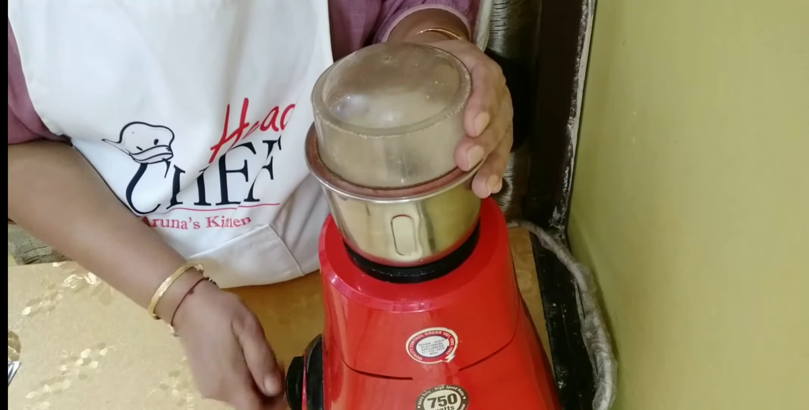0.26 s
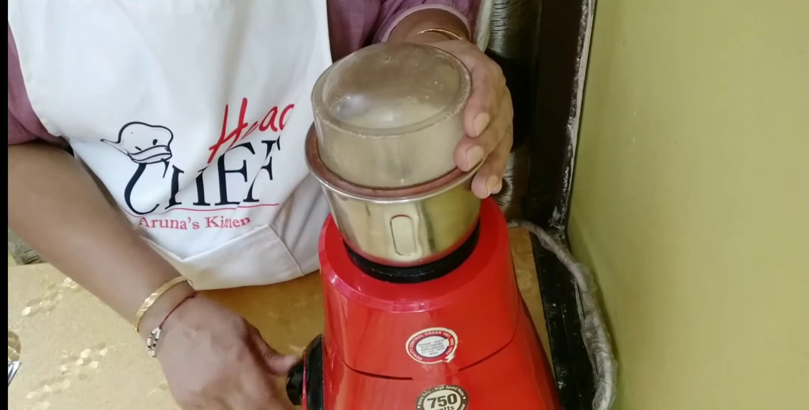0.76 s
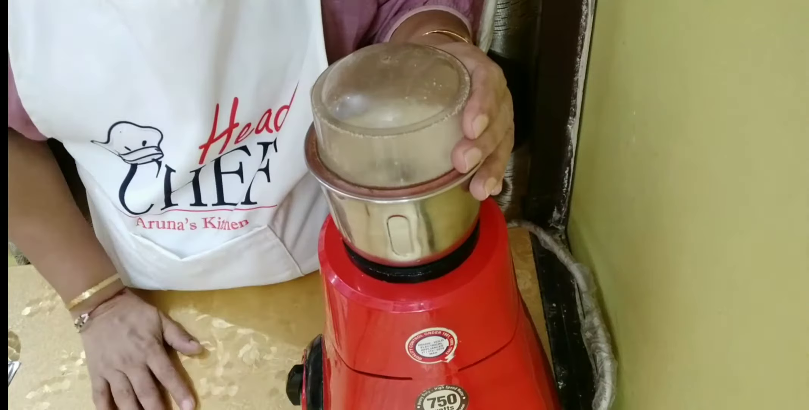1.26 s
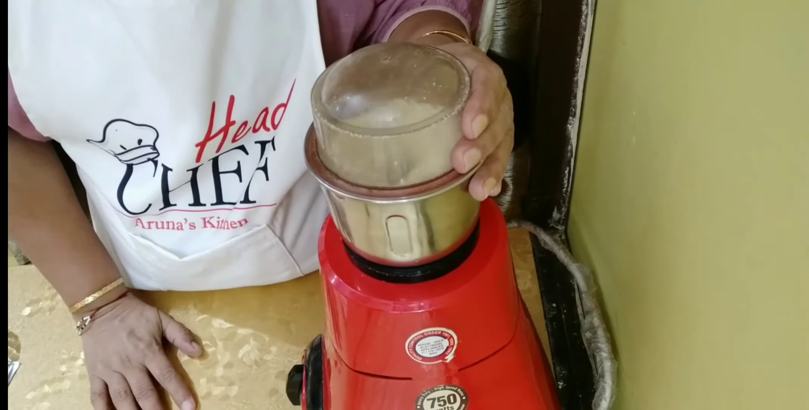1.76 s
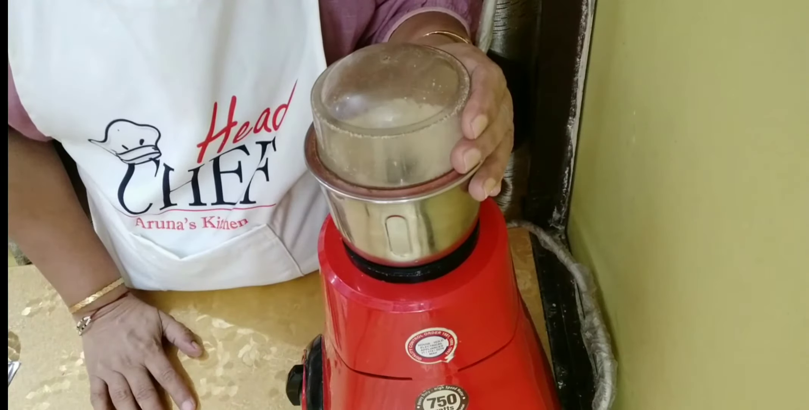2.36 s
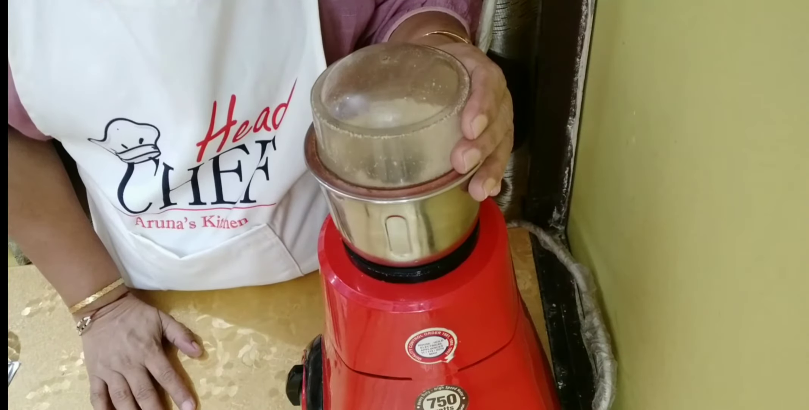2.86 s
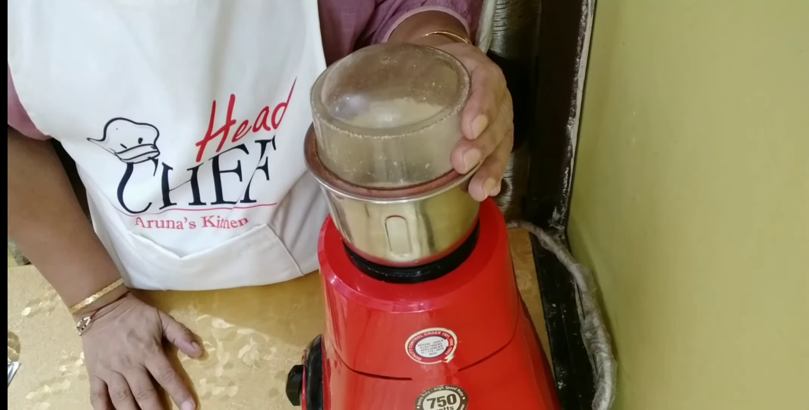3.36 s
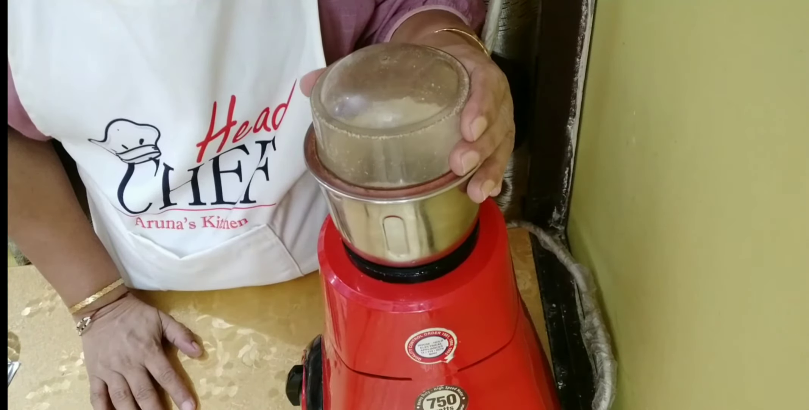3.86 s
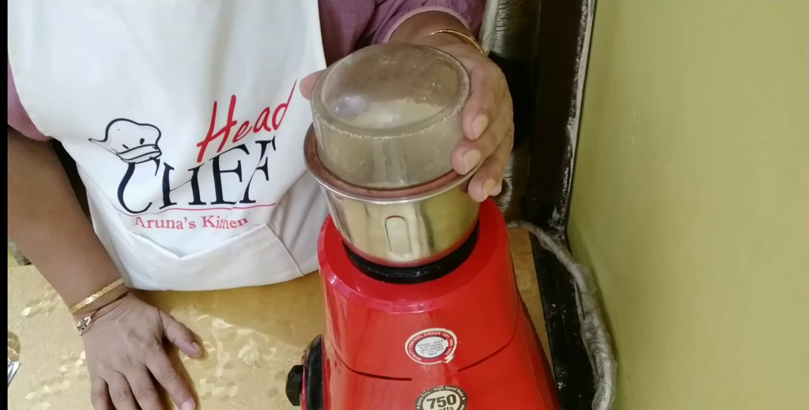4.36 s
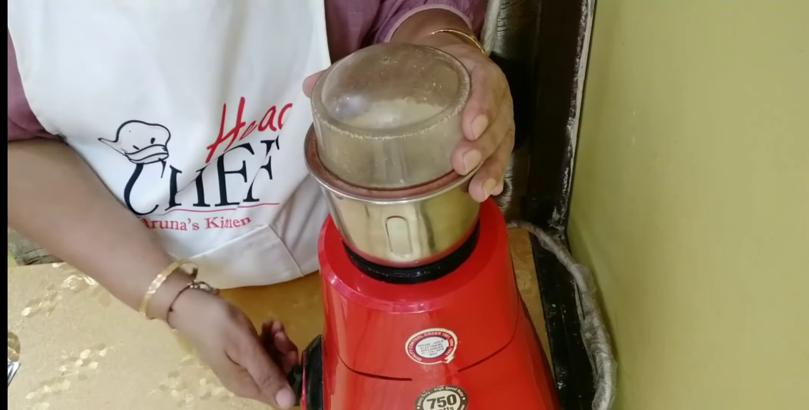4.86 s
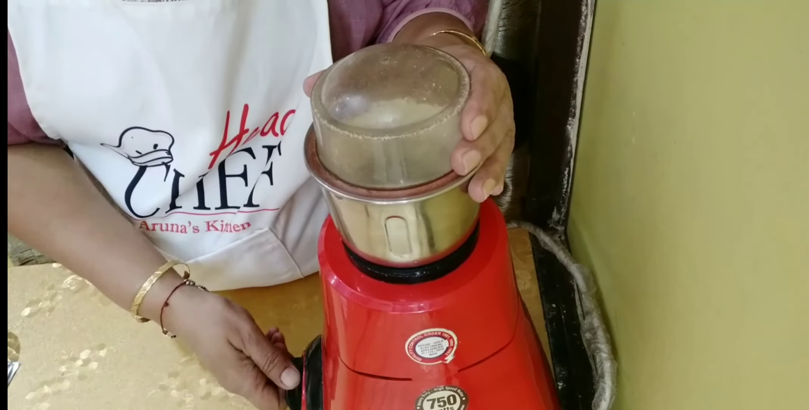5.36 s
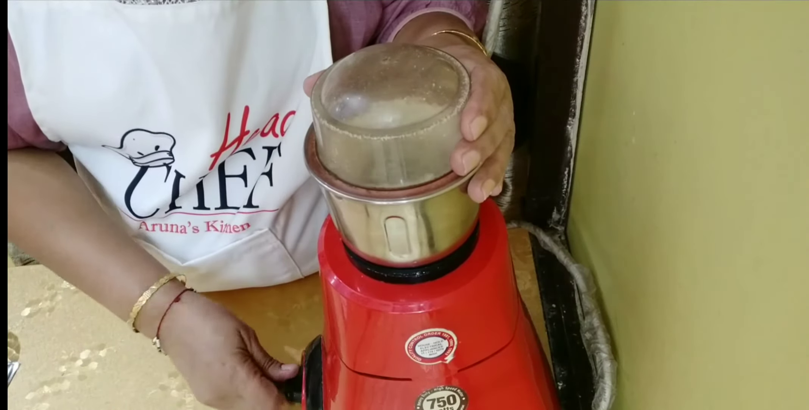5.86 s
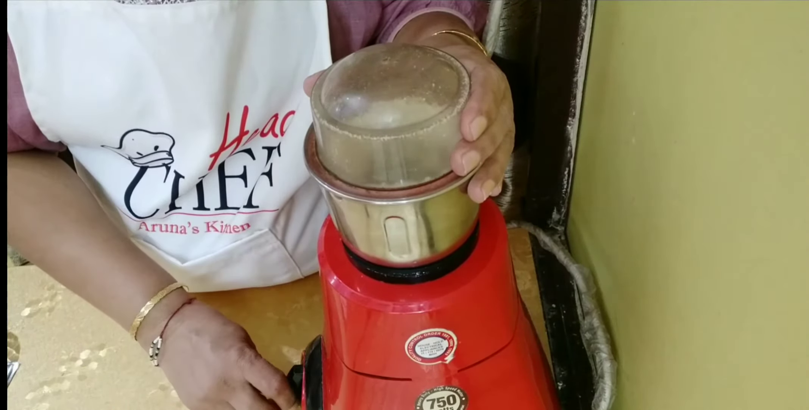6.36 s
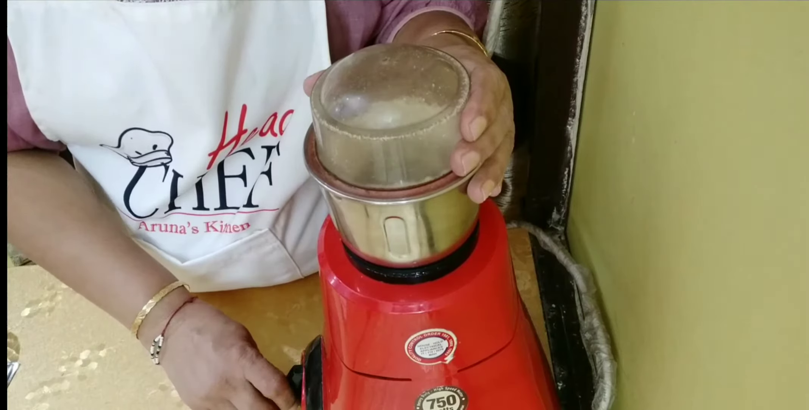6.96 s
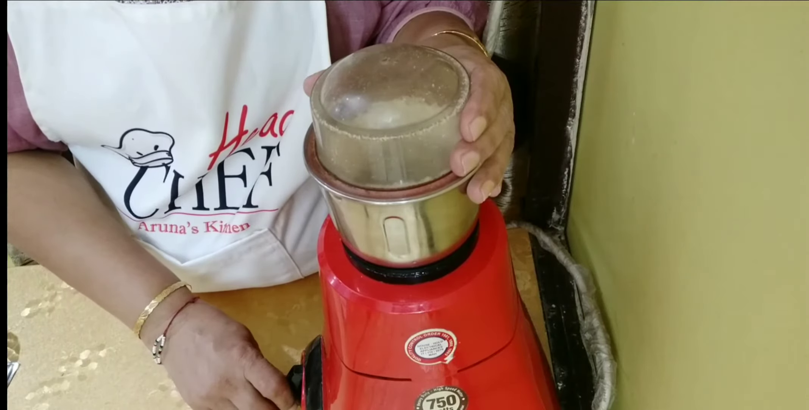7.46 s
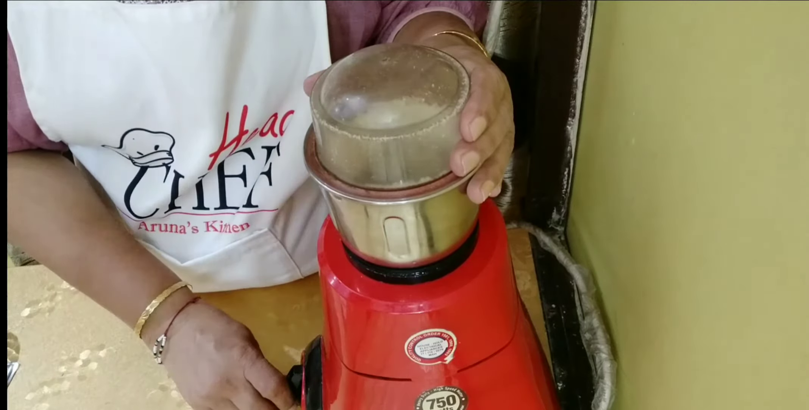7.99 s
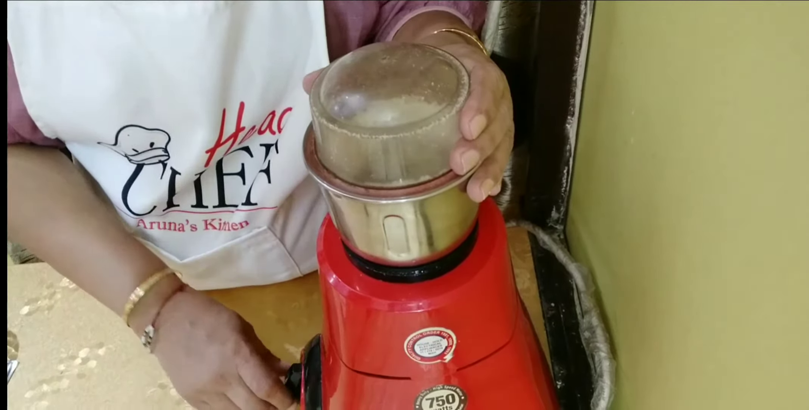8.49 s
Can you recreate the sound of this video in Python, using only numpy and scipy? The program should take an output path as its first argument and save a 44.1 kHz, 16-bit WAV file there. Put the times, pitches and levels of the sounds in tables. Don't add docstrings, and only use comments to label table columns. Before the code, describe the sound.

Close, harsh motor whine and gritty churn of nuts in a steel jar, rising in speed, then coasting down to a few clacks and quiet.

```python
import sys
import numpy as np
from scipy import signal
from scipy.fft import rfft, irfft, next_fast_len
from scipy.io import wavfile
from scipy.ndimage import uniform_filter1d, map_coordinates

SR = 44100
rng = np.random.default_rng(int(sys.argv[2]) if len(sys.argv) > 2 else 0)


def voltage_ratio(decibels):
    exponent = np.asarray(decibels, float) / 20
    return 10 ** exponent


def bounce(signal):
    frames = np.transpose(np.atleast_2d(signal))
    limited = np.clip(frames, -1, 1)
    pcm = np.round(limited * 32767).astype(np.int16)
    wavfile.write(sys.argv[1], SR, pcm)


N = 384860


def unit(x):
    return x / np.sqrt(np.mean(x ** 2) + 1e-20)


def along(points, hz):
    f, v = np.transpose(points)
    return np.interp(np.log(hz + 1), np.log(f + 1), v)


def curves(rows):
    s, *cols = np.transpose(rows)
    return [np.interp(np.arange(N) / SR, s, c) for c in cols]


def wobble(rate):
    knots = rng.standard_normal(int(N * rate / SR) + 4)
    return map_coordinates(knots, [np.arange(N) * rate / SR])


def filtered(x, response):
    m = next_fast_len(N + SR // 2)
    return irfft(rfft(x, m) * response(np.fft.rfftfreq(m, 1 / SR)), m)[..., :N]


def above(hz, edge_hz):
    return 1 / np.sqrt(1 + (edge_hz / (hz + 1)) ** 8)


def smoothed(field, bins, frames):
    return uniform_filter1d(uniform_filter1d(field, size=bins, axis=0), size=frames, axis=1)


def patchy(patchy_db):
    z = signal.stft(rng.standard_normal((2, N)), nperseg=512)[2]
    field = smoothed(rng.standard_normal(z.shape[1:]), 8, 10)
    return signal.istft(z * voltage_ratio(patchy_db * unit(field)), nperseg=512)[1][:, :N]


def housing(hz, between_db):
    # (frequency [Hz], width [Hz], level [dB])
    modes = [(123.5, 16.5, -0.5), (290, 52, -3.5), (383.3, 26, 2), (537.5, 17.4, 4.5), (652.5, 35, -1),
             (784, 28, 2), (830, 19, 1.5), (940, 35, -1), (1011.6, 12, 3), (1173, 60, -6.5),
             (1270, 10, 1.5), (1385, 50, 1.5), (1464, 38, -5), (1657, 45, 0), (1869, 31, -9),
             (2181, 31, -1.5), (2491, 8.8, 1.5), (2756, 11, 2)]
    peaks = sum((voltage_ratio(db) * hz * w) ** 2 / ((c * c - hz * hz) ** 2 + (hz * w) ** 2) for c, w, db in modes)
    return np.sqrt(peaks + voltage_ratio(between_db) ** 2)


def ports(pair, colour, side_db):
    # (frequency [Hz], level [dB per Hz])
    sum_colour = [(25, -43.5), (80, -23.5), (180, -17), (290, -7.5), (400, -7.5), (800, -4.5), (1400, -1.5),
                  (2300, -5.5), (3000, -10.5), (3600, -22.5), (4300, -12.5), (5400, -11.5), (5800, -14.5),
                  (6900, -15), (7600, -18.5), (8000, -22.5)]
    # (frequency [Hz], level [dB per Hz])
    difference_colour = [(15, -77), (25, -45), (123, -31), (209, -11), (392, -7.5), (536, -6), (699, -17.5),
                         (789, -11), (1130, -7.5), (1370, -2), (1790, -2), (3050, -3.5), (3700, -9),
                         (4300, -11), (5100, -7), (5800, -12), (6400, -14), (6850, -10.5), (7150, -13.5),
                         (7700, -14.5), (8000, -18.5), (10400, -57.5), (17600, -120)]
    # (frequency [Hz], correlation [-1 to 1])
    likeness = [(60, 0), (130, -.4), (300, -0.05), (700, 0.1), (1300, .6), (2400, 0.2), (4400, -0.46),
                (8000, -0.19)]

    def difference(hz):
        like = np.clip(along(likeness, hz), -1, 1)
        return colour(hz) * voltage_ratio(along(difference_colour, hz)) * np.array([like, np.sqrt(1 - like ** 2)])

    mid = filtered(pair[0], lambda hz: colour(hz) * voltage_ratio(along(sum_colour, hz)))
    side = voltage_ratio(side_db) * filtered(pair, difference).sum(0)
    return unit(np.array([mid + side, mid - side]))


def placed(x):
    # (frequency [Hz], level [dB])
    left_over_right = [(60, -6), (110, 1.5), (200, -10.5), (380, 3.5), (700, -0.5), (1290, 7), (2370, -0.5),
                       (4380, 1), (8080, -4), (14900, -9.5)]
    # (frequency [Hz], phase [radians])
    left_lead = [(100, 1.3), (1500, 0.12), (2000, 0.65), (2700, 2), (3600, 4.5)]
    half = np.array([[.5], [-.5]])
    return filtered(x, lambda hz: voltage_ratio(half * along(left_over_right, hz)) * np.exp(1j * half * along(left_lead, hz)))


def kitchen():
    # (frequency [Hz], level [dB per Hz])
    room_tone = [(18, -54), (30, -30), (80, -20), (145, -5), (513, -16.5), (1430, -20), (1580, -27),
                 (2000, -23.5), (2660, -27), (3460, -27), (9000, -50.5), (11700, -72.5), (19800, -120)]
    a, b = filtered(patchy(1.2), lambda hz: voltage_ratio(along(room_tone, hz)))
    return voltage_ratio(-73) * unit(np.array([a + .6 * b, a - .6 * b]))


def knocks():
    # (time [s], peak [dB], thud [dB], ring [dB])
    catches = [(7.715, -40, 15, -15), (7.755, -32, 4, -15), (7.888, -36, 9, -15), (7.896, -33, 6, -15),
               (8.025, -60, 14, -15), (8.495, -80, 17, -15), (7.8062, -33, -1, -9.5),
               (7.8424, -20, -17, -13), (7.9347, -33.5, -8, -9), (8.0481, -59, 11, -9),
               (8.092, -49, 4, -15), (8.104, -56, 17, -15), (8.135, -66, 17, -15), (8.225, -78, 17, -15),
               (8.285, -82, 17, -15), (7.868, -38, 9, -15), (8.0, -58, 12, -15), (8.399, -58.5, -12, -2)]
    # (frequency [Hz], level [dB], decay by 60 dB [s])
    jar_modes = [(1420, -3, .03), (1970, 3.5, 0.041), (3300, 1.5, 0.029), (5270, -7, .02), (6700, -4, .03)]
    out, t = np.zeros(N + SR), np.arange(SR // 4) / SR
    thump = voltage_ratio(-60 * t / .07) * np.sin(2 * np.pi * 300 * t)
    worktop = voltage_ratio(-4.5 - 60 * t / .22) * np.sin(2 * np.pi * 125 * t)
    for s, db, thud_db, ring_db in catches:
        ring = sum(voltage_ratio(ring_db + level - 60 * t / t60) * np.sin(2 * np.pi * hz * t)
                   for hz, level, t60 in jar_modes)
        crack = (1.3 * voltage_ratio(-60 * t / .008) + .35 * voltage_ratio(-60 * t / .08)) * rng.standard_normal(len(t))
        thud = voltage_ratio(thud_db) * (thump + worktop)
        out[round(s * SR):][:len(t)] += voltage_ratio(db - 3) * (ring + crack + thud)
    return placed(filtered(out[:N], lambda hz: above(hz, 105) * (1 - 0.97 * above(hz, 7800))))


def effort(shaft_hz):
    # (time [s], level [dB])
    grind = [(0, -24.5), (.6, -24.5), (1.3, -24), (3.5, -26), (4.25, -23), (5.4, -24.5), (5.9, -26),
             (6.1, -25), (6.5, -25), (6.75, -23), (7.35, -23.5), (7.55, -23.5)]
    # (time [s], swell [dB], half length [s])
    slumps = [
        (.08, 3, .1),
        (.42, 3, .15),
        (0.691, 8.5, 0.03),
        (3.45, 2.5, .15),
        (3.733, 5.5, 0.15),
        (3.95, 4, .12),
        (5.69, 1.5, .06),
        (6.655, 5.5, 0.055),
        (7.261, -1.5, 0.056),
        (7.47, 2, .08),
    ]
    # (time [s], level [dB])
    settling = [(7.56, -1), (7.725, -6.5), (7.74, -15), (7.838, -26), (7.85, -13.5), (7.9, -15.5),
                (7.974, -31), (8.084, -43), (8.1, -39.5), (8.17, -49), (8.36, -85)]
    t = np.arange(N) / SR
    (grind_db,), (settle_db,) = curves(grind), curves(settling)
    slump_db = sum(db * np.maximum(1 - abs(t - s) / half, 0) for s, db, half in slumps)
    slow = np.maximum(1 - shaft_hz / 131, 0)
    knob_db = 2.5 * np.clip(10 * (t - 3.6), 0, 1)
    base_rings_db = 4 * np.clip((t - 7.95) / 0.08, 0, 1)
    rumble_db = grind_db - 7.5 + slump_db + knob_db + 14 * slow + settle_db + base_rings_db
    churn_db = grind_db + 0.59 * slump_db + 1.07 * settle_db
    finer_db = -0.8 * t
    hiss_db = -25.3 + finer_db - 6.5 * np.minimum(2 * slow, 1) + settle_db
    return rumble_db, churn_db, hiss_db


def load(turn, rumble_db, churn_db, hiss_db):
    # (frequency [Hz], level [dB])
    air_colour = [(8000, -15.5), (8300, -10.5), (8950, -1), (9200, -1.5), (10200, -3), (12000, -8),
                  (13600, -8.5), (14700, -12.5), (15200, -7), (15500, -8)]
    chips_per_s, chip_s, chip_size = 300, .0008, 1.1
    beat = 1 + 0.049 * np.cos(turn)
    strikes = (rng.random(N) < chips_per_s / SR) * chip_size * rng.random(N)
    chips = 1 + signal.lfilter([1], [1, -np.exp(-1 / (chip_s * SR))], strikes)

    def base(hz):
        return housing(hz, between_db=-12.5) * (1 - 0.72 * above(hz, 437)) * (1 - above(hz, 1100))

    def jar(hz):
        return housing(hz, between_db=-8.5) * above(hz, 430) * (1 - above(hz, 4000))

    rumble = ports(patchy(1.7), base, side_db=-4.5)
    churn = ports(beat * patchy(0.86), jar, side_db=-1)
    hiss = ports(beat * chips * patchy(1.0), lambda hz: above(hz, 3190) * (hz < 8050), side_db=-3)
    air = unit(filtered(patchy(0.97), lambda hz: voltage_ratio(along(air_colour, hz)) * (hz > 8050)))
    brighter_db = np.minimum(np.arange(N) / SR, 6)
    return (voltage_ratio(rumble_db) * rumble + voltage_ratio(churn_db + 1.26) * churn
            + voltage_ratio(hiss_db + 6) * (hiss + voltage_ratio(brighter_db - 17.5) * air))


def speed():
    # (time [s], shaft rate [Hz], evenness [dB])
    powered = [(0.0, 195, -3), (.2, 191, -3), (.4, 200, -5), (0.65, 204.5, -7), (1.19, 212.8, 0),
               (1.53, 210.5, -2.5), (2.2, 200.4, 2.5), (2.65, 194.9, 4.5), (3.05, 197.8, 3), (3.4, 206, 4),
               (3.68, 212.5, 3), (3.92, 221, 1.5), (4.2, 245, 1), (4.4, 257.4, -1), (4.74, 269.8, 2.5),
               (5.05, 277, 1), (5.34, 272.4, 2.5), (5.63, 271.1, 3.5), (5.74, 252.7, 2), (6.16, 252.4, 5)]
    # (time [s], shaft rate [Hz])
    coast = [
        (6.16, 252.4),
        (6.4, 220),
        (6.66, 190),
        (6.87, 168),
        (7.03, 150),
        (7.33, 112.5),
        (7.43, 98.5),
        (7.6, 68.5),
        (7.95, 1),
    ]
    off_s, coast_db = 6.16, 1
    shaft_hz, even_db = curves(powered)
    free = np.maximum(np.arange(N) / SR - off_s, 0)
    shaft_hz = np.where(free > 0, curves(coast)[0], shaft_hz)
    slack_db = -9 * np.maximum(1 - abs(free / .07 - 1), 0)
    coasting_db = even_db + (coast_db - even_db) * np.minimum(5 * free, 1) + slack_db
    return shaft_hz, np.where(free > 0, coasting_db, even_db)


def order_shift(order):
    # (order [turns], time [s], half length
    # [s], level shift [dB])
    shifts = [(1, 4.82, .2, -8), (1, 5.35, .14, 5), (1, 5.63, .1, 5), (1, 6.28, .16, 8), (2, 4.3, .12, 8),
              (2, 6.0, .18, -5), (2, 6.47, .22, 6), (3, 3.25, .12, 5), (3, 4.75, .12, 5), (3, 6.0, .22, -5),
              (3, 6.47, .16, 6), (3, 7.38, .22, 8), (4, 1.3, .3, 4), (4, 2.5, .14, -5), (4, 3.33, .18, -4),
              (4, 3.55, .12, 4), (4, 4.9, .12, 5), (4, 5.55, .22, -5), (4, 6.33, .08, 4), (4, 6.52, .1, 5),
              (4, 7.2, .1, 1), (4, 7.52, .04, -5), (4, 6.72, .1, -5), (4.5, .53, .16, 14), (5, 2.8, .28, 6),
              (5, 3.5, .2, -7), (5, 4.0, .12, 6), (5, 4.5, .22, 6), (5, 6.27, .12, 10), (5, 6.85, .2, -5),
              (6, 1.3, .2, 4), (6, 3.1, .1, -7), (6, 3.25, .12, 9), (6, 4.45, .14, 6), (6, 5.45, .25, -8),
              (6, 7.49, .06, 8), (7, 3.25, .12, -6), (7, 3.92, .22, -8), (7, 4.5, .18, 6),
              (7, 5.1, .25, -12), (7, 6.27, .12, 6), (7, 3.5, .12, 2), (7, 7.45, .12, 8), (8, 1.3, .3, -6),
              (8, 3.37, .08, 3), (8, 3.55, .1, -4), (8, 6.05, .15, -10), (8, 7.6, .12, 6), (9, 4.55, .3, 7),
              (10, 3.1, .5, -6), (15, 2.4, .2, 6), (18, 2.75, .2, 6),
              (1, 4.42, .08, 8), (1, 5.95, .25, -3), (2, 4.1, .15, -6), (2, 4.42, .08, 8),
                   (3, 5.3, .35, 4), (4, 4.55, .16, -5), (3, 7.47, .18, 5), (4, 3.1, .3, -3),
                   (4, 3.95, .12, -3), (4, 6.18, .06, -4), (4, 7.0, .1, -4), (4.5, 3.22, .15, 7),
                   (5, .85, .16, 9), (5, 1.84, .1, 7), (5, 2.4, .15, 4), (5, 6.47, .12, 7),
                   (5, 7.18, .13, 8), (6, 1.9, .15, 5), (6, 2.23, .15, -5), (6, 3.44, .08, 5),
                   (6, 3.7, .3, -6), (6, 6.55, .08, 5), (6, 7.0, .35, -8), (7, .4, .2, -6),
                   (7, 1.55, .12, 5), (7, 5.55, .2, -5), (7, 7.1, .3, -8), (3, 6.76, .12, -5),
                   (8, 4.25, .12, 8), (8, 6.4, .25, -7), (8, 7.15, .14, -7), (9, 6.05, .2, -7),
                   (10, 3.72, .12, -8), (10, 4.6, .15, -9), (10, 6.05, .3, 6), (10, 6.8, .5, -8),
                   (11, 1.4, .3, 4), (11, 3.15, .15, -8), (12, 1.3, .2, 4), (12, 1.75, .15, -8),
                   (12, 3.9, .2, -10), (12, 4.95, .3, -9), (12, 6.0, .3, 5), (12, 6.8, .3, -8),
                   (13, .9, .75, -8), (25, .8, .5, 7), (26, 1.3, .4, 7), (26, 3.55, .35, 9),
                   (6.5, 3.68, .32, 14), (4, 7.67, .07, 5)]
    t = np.arange(N) / SR
    return sum(db * np.clip(1.5 - 1.5 * abs(t - s) / half, 0, 1)
               for k, s, half, db in shifts if round(2 * k) == round(2 * order))


def motor(shaft_hz, even_db):
    # (shaft rate [Hz], unbalance [dB], second order [dB], blade pass [dB])
    run_up = [(45, -72, -57, -54.5), (69, -65.5, -56, -18), (78.5, -68, -63, -31.5), (94, -60.5, -57, -23),
              (118, -45.5, -59, -30.5), (140, -44, -49, -37), (167.6, -37, -50, -38.5),
              (180, -44, -43.5, -37.5), (197, -60, -44, -29.5), (206, -55, -48, -36), (228, -42, -31, -28),
              (243.6, -42, -42.5, -32), (251, -34.5, -47, -24), (262, -38, -30, -32.5),
              (272.6, -29, -27.5, -38), (277, -32, -24.5, -32)]
    # (multiple of the shaft rate [turns], level [dB])
    orders = [(3, -8), (4.5, -18.5), (5, -12), (6, -5), (7, -5), (8, -5), (9, -6.5), (10, -3.5), (11, -8),
              (12, -2), (13, -4), (14, -4), (15, -3), (16, -5), (17, -5), (18, -4), (25, -8), (26, -8),
              (6.5, -17)]
    even_flutter_db = 3.5
    flutter_db = np.maximum(even_flutter_db - 0.43 * even_db, 0)
    waver = .002 * flutter_db / even_flutter_db * wobble(25)
    turn = 2 * np.pi * np.cumsum(shaft_hz * (1 + waver)) / SR
    turning = np.clip((7.745 - np.arange(N) / SR) / 0.025, 0, 1)
    hz, *levels = np.transpose(run_up)
    strong = 0
    for k, db in zip((1, 2, 4), levels):
        level_db = np.interp(shaft_hz, hz, db) + order_shift(k) + 3.5 + 0.75 * even_db
        strong = strong + voltage_ratio(level_db - 0.9 * flutter_db * abs(wobble(9))) * np.sin(k * turn)
    rest = 0
    for k, db in orders:
        lopsided_db = -1.4 * even_db * (k % 1 > 0)
        level_db = db + order_shift(k) + lopsided_db + 1.5 * wobble(2.987) + 0.7 * flutter_db * wobble(15)
        tone = np.sin(k * turn + rng.uniform(0, 2 * np.pi))
        rest = rest + voltage_ratio(level_db) * housing(k * shaft_hz, between_db=-14) * tone
    strong = voltage_ratio(.6 * flutter_db * wobble(35)) * strong
    rest = voltage_ratio(even_db - 25.5) * np.minimum(shaft_hz / 200, 1) * rest
    return placed(turning * (strong + rest)), turn


def scene():
    shaft_hz, even_db = speed()
    whine, turn = motor(shaft_hz, even_db)
    return whine + load(turn, *effort(shaft_hz)) + knocks() + kitchen()


def starved(mid, side):
    # (time [s], edge [Hz])
    edge = [(0, 3110), (1.3, 3110), (1.7, 3220), (3.6, 3240), (4, 3130), (5.3, 3130), (6, 3150), (8, 3220)]
    spared = [3.47, 5.4, 5.73, 7.858]
    # (low [Hz], high [Hz], from [s], to [s], share of moments lost [0 to 1])
    holes = [(1940, 2070, 4.2, 5.75, .45), (2600, 2720, 2.2, 3.6, .5), (2820, 2910, 2.2, 3.1, .5),
             (2250, 2420, 5.55, 6, .3), (2600, 2730, 0, 2.2, .2), (2620, 2780, 4.4, 4.8, .3),
             (2850, 3100, 5.65, 5.85, .7)]
    hz, t, z = signal.stft([mid, side], SR, nperseg=1024)
    hz = hz[:, None]
    chance = rng.standard_normal((3, len(t)))
    steps = np.repeat(chance, 2, axis=1)[:, :len(t)]
    cancelled = (hz > np.interp(t, *np.transpose(edge)) + 120 * steps[0]) & (hz < 3910 + 55 * steps[1])
    unspared = abs(t - np.c_[spared]).min(0) > .018
    cancelled &= (t < 8.15) & (unspared | (hz < 3470) | (hz > 3760))
    dip = (hz > 7930 + 140 * steps[1]) & (hz < np.where(steps[2] > .3 * t - 1.9, 8980, 8300))
    specks = unit(smoothed(rng.standard_normal(z.shape[1:]), 4, 4))
    speck_limit = np.interp(hz, [1900, 2600, 3100, 3900, 6900, 8000, 8300, 12000, 15500],
                            [1.8, 1.05, .8, 3, 2.6, 1.4, .35, .15, -.1])
    lost = np.ones((2, 1, 1), bool) & (dip | (specks > speck_limit))
    often = np.repeat(rng.random((len(holes), len(t))), 4, axis=1)[:, :len(t)]
    lost[0] |= cancelled
    for (low, high, start, end, share), u in zip(holes, often):
        lost[0] |= (hz > low) & (hz < high) & (t > start) & (t < end) & (u < share)
    lost |= hz > np.where(often[0] < .6, 15180, 15600)
    lost[1] &= hz > 7000
    return signal.istft(z * ~lost, SR, nperseg=1024)[1][:, :N]


def low_pass(x):
    return signal.sosfilt(signal.butter(12, 15520, fs=SR, output="sos"), x)


def record(dry):
    mid, side = starved((dry[0] + dry[1]) / 2, (dry[0] - dry[1]) / 2)
    kept = np.arange(N) < 8.527 * SR
    return low_pass(kept * np.array([mid + side, mid - side]))


dry = scene()
out = record(dry)
bounce(out)
```